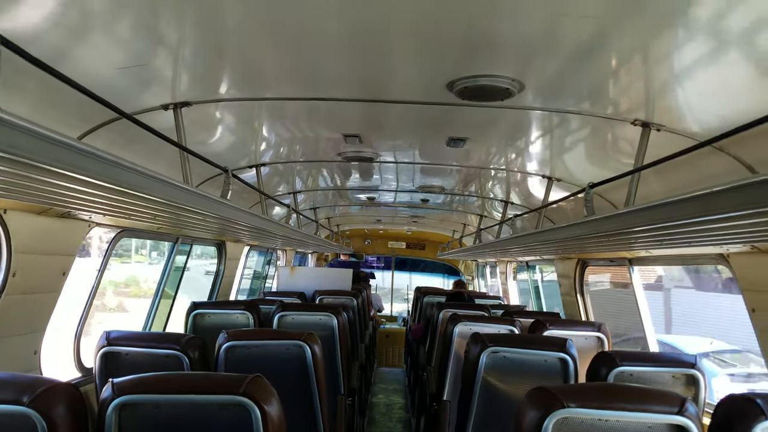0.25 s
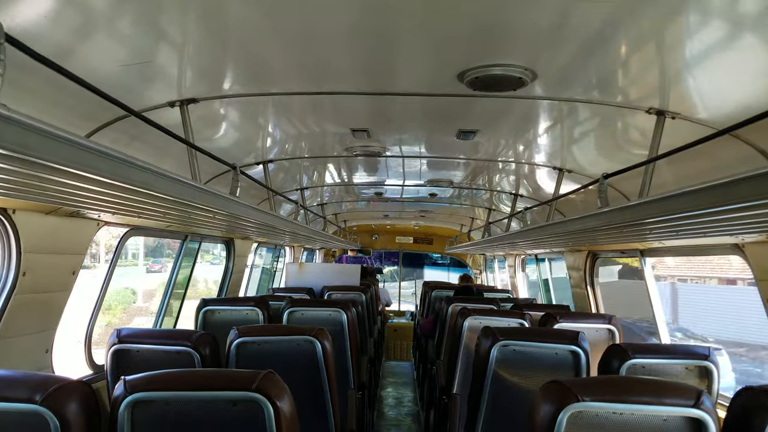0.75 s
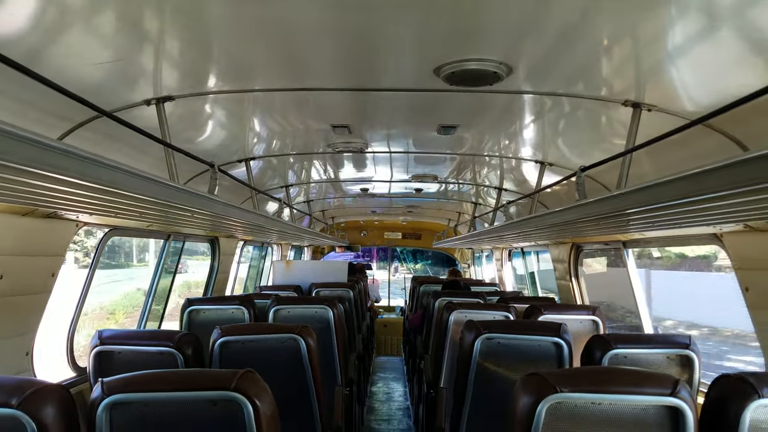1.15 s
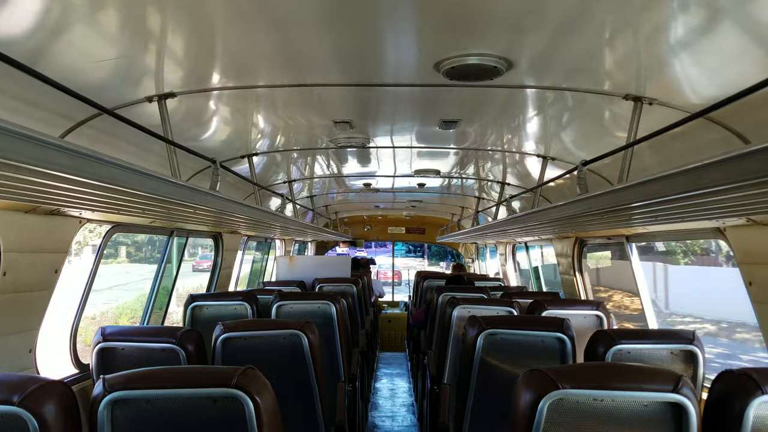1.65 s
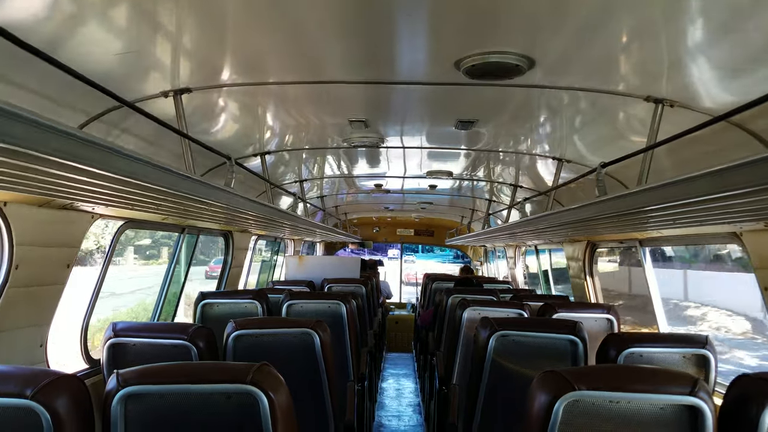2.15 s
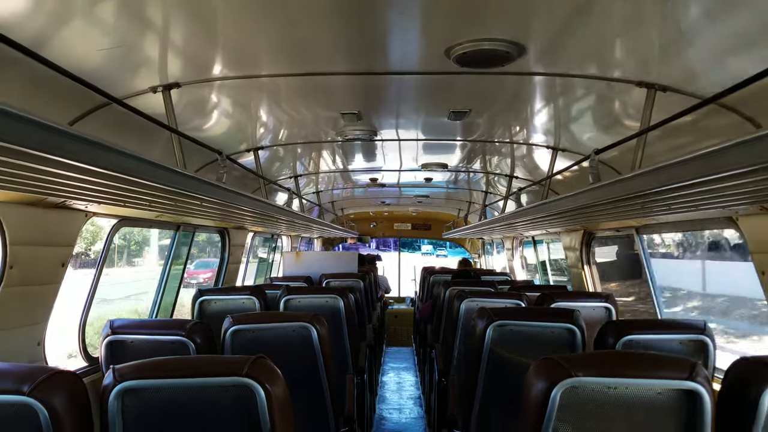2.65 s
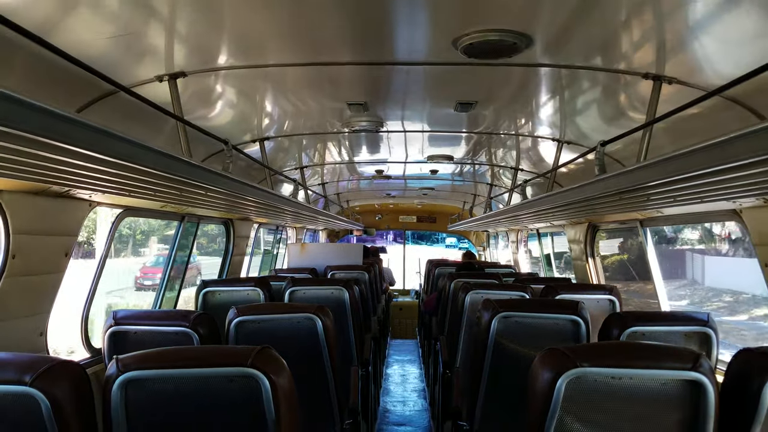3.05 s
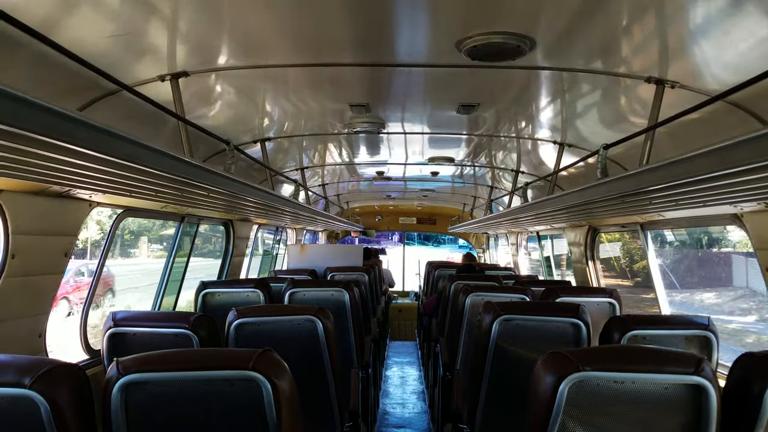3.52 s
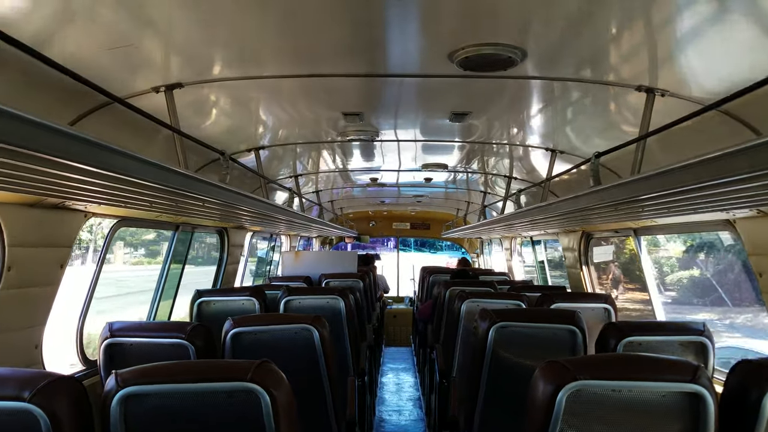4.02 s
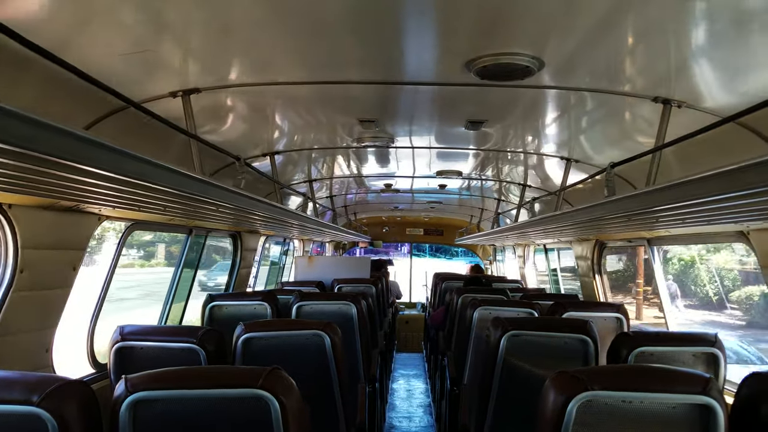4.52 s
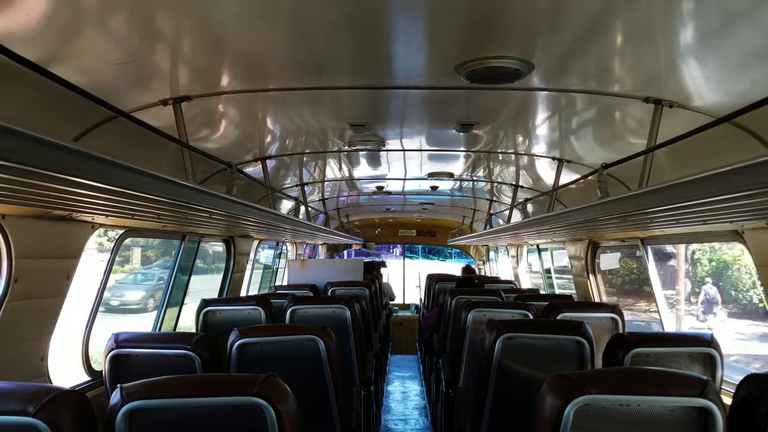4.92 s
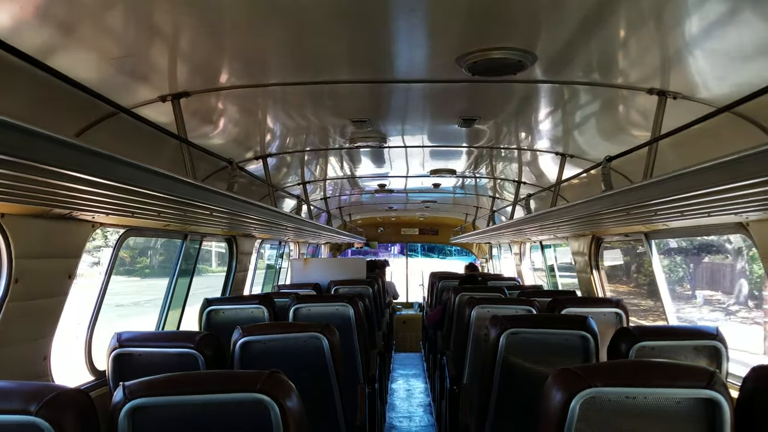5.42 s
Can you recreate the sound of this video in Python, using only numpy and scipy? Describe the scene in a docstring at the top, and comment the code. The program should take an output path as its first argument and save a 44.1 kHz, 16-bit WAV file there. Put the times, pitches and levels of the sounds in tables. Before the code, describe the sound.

A diesel engine drones deeply inside an old bus, rising in pitch then easing off, over road rumble and faint rattles.

```python
"""Old coach, from inside

It gathers speed along a street, then eases off. A six-cylinder two-stroke diesel and the faster drive
shaft drone together, their orders swelling as they cross cabin resonances. Around them: faint gear
whine, a singing panel, road rumble, engine roar and clatter, small rattles of the fittings."""
import sys
import numpy as np
from scipy import signal
from scipy.fft import rfft, irfft, next_fast_len
from scipy.io import wavfile
from scipy.ndimage import uniform_filter1d, minimum_filter1d

SR = 44100
rng = np.random.default_rng(int(sys.argv[2]) if len(sys.argv) > 2 else 0)


def unload_wav(signal):
    """Save mono or channel-first audio to the path in sys.argv[1] as 16-bit WAV at rate SR, clipped to [-1, 1]."""
    wavfile.write(
        sys.argv[1],
        SR,
        np.round(np.clip(np.atleast_2d(signal).T, -1, 1) * 32767).astype(np.int16),
    )


N = 250047
TIME = np.arange(N) / SR

# crank speed: t/s, f/Hz
CRANK_HZ = [(0, 20.1), (.74, 23.1), (1, 24), (1.97, 28), (2.71, 30.78), (3.45, 33.48), (4.19, 35.98),
            (4.62, 36.55), (5.2, 35.8), (5.42, 35), (5.67, 33.5)]
# strong orders, ahead of their path: multiple of own speed, level under load/dB, change off throttle/dB
CRANK_ORDERS = [(1, -20, 6.5), (3, -23.5, 4), (4, -22, 5), (5, -20, -0.5), (6, -14, -13)]
SHAFT_ORDERS = [(1, -18, 0.5), (2, -14, 1.5), (3, -14.5, 0), (4, -14, -1)]
# paths into the cabin, the shaft's through the floor: f/Hz, gain/dB
ENGINE_PATH_DB = [(22, -10.5), (36, -6.5), (62, -12), (86, 3.5), (98, -2.5), (126, -8), (150, 2), (162, 0),
                  (173, -10.5), (183, -1.5), (200, 1.5), (215, -1)]
SHAFT_PATH_DB = [(28, -22), (39, -5), (44, -5.5), (49, 3), (58, -17.5), (95, -13.5), (105, -3.5), (124, -1),
                 (132, 2.5), (138, 0), (145, -11), (160, -14.5), (205, -10.5)]
# weak tones: multiple of crank speed
WEAK_MULTIPLES = (1.235, 1.835, 2, 3.373, 3.635, 4.42, 5.248, 7.075, 8, 8.523, 9, 9.213, 9.777, 10, 10.885,
                  11.32, 12, 13, 14, 15.643, 15.8, 17, 21.1)
# same tones, ahead of the air modes: level/dB
WEAK_LEVELS_DB = [-36, -32.5, -26.5, -31, -28.5, -33.5, -32.5, -28, -35.5, -34, -29.5, -36, -37, -42.5, -33,
                  -41, -41, -41.5, -41, -45.5, -47, -42, -39]
# cabin air modes: f/Hz, gain/dB
AIR_MODES_DB = [(36, -8), (55, 0), (150, 0), (178, -4), (212, 6), (232, -3), (268, 4), (290, 1), (325, -4),
                (350, -1), (372, 4), (410, -2), (450, -6), (520, -4), (570, -2), (630, -5)]
# envelopes: t/s, relative level/dB
PANEL_ENVELOPE = [(0, -18.5), (.4, -29.5), (1, -31.5), (1.75, -26), (2.05, -30), (2.25, -25.5),
                  (2.7, -29.5), (3.5, -34), (3.7, -27.5), (4.6, -26.5), (4.95, -26), (5.2, -24),
                  (5.45, -35), (5.67, -28)]
ROAD_ENVELOPE = [(0, -15), (.4, -22), (.7, -16), (1.1, -21), (2.6, -19.5), (2.95, -19.5), (3.8, -25),
                 (4.1, -14), (4.6, -15), (5.3, -21.5), (5.67, -19)]
JINGLE_ENVELOPE = [(0.0, -55.5), (0.63, -52.5), (0.76, -55), (2.12, -55), (2.46, -53), (3.5, -53),
                   (3.58, -52.5), (4.55, -53), (5.67, -56)]
# noise spectra: f/Hz, relative level/dB
ROAD_SPECTRUM = [(12, -13), (20, 1.5), (35, -9.5), (52, -4.5), (70, -2), (88, 1.5), (130, 9.5), (165, 3.5),
                 (215, 5.5), (270, -13), (340, -13.5)]
ROAR_SPECTRUM = [(220, -9.5), (280, -3.5), (330, 0.5), (400, -2.5), (460, -5), (520, -1), (630, -9),
                 (790, -8.5), (900, -11), (1100, -15), (1400, -27.5)]
CLATTER_SPECTRUM = [(800, -12), (1200, 0.5), (1500, -0.5), (1950, -0.5), (2300, -1), (2800, -4),
                    (3400, -8.5), (4200, -13), (5000, -17.5), (5750, -23), (6150, -31), (8000, -36.5),
                    (10000, -38)]
JINGLE_SPECTRUM = [(8000, -28), (10200, -20.5), (11000, -10), (12200, -2.5), (13500, -1.5), (15200, -6),
                   (16000, 0.5)]
TICK_SPECTRUM = [(2500, -11.5), (5000, 6), (6800, -12.5), (8500, -22), (10500, -14.5), (12500, -1),
                 (15000, 1.5), (16000, -3)]
# coachwork resonances: f/Hz, width/Hz, gain/dB
COACHWORK_MODES = [(294, 37, 2), (394, 12, 7), (524, 22, -1), (662, 51, 3.5), (754, 8.3, 4.5)]
# ticks: t/s, level/dB, decay/s
FITTING_TICKS = [(.749, -47.5, 0.0079), (.791, -47, .01), (1.63, -52.5, 0.0086), (3.446, -54, 0.014),
                 (3.691, -45, 0.014), (4.055, -45, 0.017), (4.078, -39, 0.0084), (4.429, -47, 0.012),
                 (5.04, -57, .01), (5.185, -50, .014), (5.308, -54, 0.016)]
# squeaks: t/s, f/Hz, level/dB, half length/s, relative pitch scatter
FITTING_SQUEAKS = [(4.09, 15000, -48, .014, .002), (4.243, 15150, -42, .012, .002),
                   (4.21, 5450, -49, .025, .02), (4.29, 5600, -49, .03, .02)]
# stereo width: f/Hz, side minus mid/dB
WIDTH_DB = [(30, -26), (50, -16), (75, -14), (200, -18.5), (380, -9.5), (700, -6.5), (1200, 3.5),
            (2400, 0.5), (4400, 0.5), (8000, -0.5), (15000, 0.5)]
# noise balance: f/Hz, left minus right/dB
BALANCE_DB = [(60, 0.5), (500, 1), (1700, 0.5), (2800, 5), (4200, -1), (5200, -8), (6400, -7), (9800, 2.5),
              (15000, 6)]


def from_db(db):
    """Decibels to gain."""
    return 10 ** (np.asarray(db) / 20)


def unit_rms(x):
    """Scale to unit power."""
    return x / np.sqrt(np.mean(x ** 2) + 1e-20)


def in_time(table):
    """Table value at every sample."""
    return np.interp(TIME, *np.transpose(table))


def at_hz(table, hz):
    """Table value on a log-frequency axis."""
    table_hz, value = np.transpose(table)
    return np.interp(np.log(hz), np.log(table_hz), value)


def drift(rate_hz):
    """Low-passed random wander, unit RMS."""
    hop, settle = 40, 2000
    pole = np.exp(-2 * np.pi * rate_hz * hop / SR)
    white = rng.standard_normal(N // hop + settle + 2)
    slow = signal.lfilter([1], [1, -2 * pole, pole * pole], white)[settle:]
    return np.interp(np.arange(N) / hop, np.arange(len(slow)), unit_rms(slow))


def swell(at_s, half_length_s):
    """Flat-topped bump, 0 to 1 and back."""
    return np.exp(-((TIME - at_s) / half_length_s) ** 4)


def off_throttle(at_s=3.87, ramp_s=.3):
    """0 under load, 1 once released."""
    return np.clip((TIME - at_s) / ramp_s, 0, 1)


def tone(turns, order, flutter):
    """One fluttering order, unit RMS; standing waves shift its phase between the sides."""
    wave = np.exp(2j * np.pi * (order * turns + rng.random()))
    mid = wave * (1 + flutter * (drift(6) + 1j * drift(6))) / np.sqrt(1 + 2 * flutter ** 2)
    mean_hz = order * turns[-1] / TIME[-1]
    side = -1j * mid * from_db(at_hz(WIDTH_DB, mean_hz)) * np.exp(1j * drift(.95))
    return np.sqrt(2) * np.array([(mid + side).real, (mid - side).real])


def cabin_noise(spectrum, modes=()):
    """Stereo noise, unit RMS in the mid: alike in the bass, diffuse above, rippled by close modes."""
    size = next_fast_len(N, True)
    hz = np.maximum(np.arange(size // 2 + 1) * SR / size, 1)
    mid, side = rfft(rng.standard_normal((2, size)))
    side *= from_db(at_hz(WIDTH_DB, hz))
    octaves_outside = np.abs(np.log2(hz / np.clip(hz, spectrum[0][0], spectrum[-1][0])))
    modes_db = sum(db / (1 + (2 * (hz - mode_hz) / width_hz) ** 2) for mode_hz, width_hz, db in modes)
    shape_db = at_hz(spectrum, hz) + modes_db - 30 * octaves_outside
    grid_hz = np.arange(0, SR / 2, 18)
    ripple = np.array([np.interp(hz, grid_hz, row) for row in rng.standard_normal((2, len(grid_hz)))])
    ripple_db = 2.2 * ripple * np.minimum(hz / 800, 1)
    sign = np.array([[1], [-1]])
    gain = from_db(shape_db + ripple_db + sign * at_hz(BALANCE_DB, hz) / 2)
    noise = irfft((mid + sign * side) * gain, size)[:, :N]
    return noise / np.std(noise.mean(axis=0))


def drone(turns, speed_hz, orders, path):
    """Orders of a turning part sweep through the booms and dead spots of its path."""
    total = 0
    for order, load_db, change_db in orders:
        level_db = load_db + change_db * off_throttle() + at_hz(path, order * speed_hz)
        total += from_db(level_db) * tone(turns, order, flutter=.1)
    return total


def weak_tones(turns, crank_hz, off_throttle_db=-.5):
    """Unsteady orders of engine, shaft and belt-driven parts cross the air modes."""
    total = 0
    for order, db in zip(WEAK_MULTIPLES, WEAK_LEVELS_DB):
        total += from_db(db + at_hz(AIR_MODES_DB, order * crank_hz)) * tone(turns, order, flutter=.3)
    return from_db(off_throttle_db * off_throttle()) * total


def gear_whine(turns, teeth=27, base_db=-49, overrun_db=11):
    """Gear mesh: faint under load, sings briefly on the overrun."""
    level_db = base_db + overrun_db * swell(at_s=4.96, half_length_s=.34)
    return from_db(level_db) * tone(turns, teeth, flutter=.15)


def panel(note_hz=566.4, wander_hz=3.5, sway_hz=23, trim_db=-4.5):
    """A body panel sings a wavering note that trembles as it sways."""
    cycles = np.cumsum(note_hz + wander_hz * (drift(2) + drift(25))) / SR
    sway_cycles = np.cumsum(sway_hz + 3 * drift(4)) / SR
    tremble = 1 + .5 * np.cos(2 * np.pi * sway_cycles)
    return from_db(in_time(PANEL_ENVELOPE) + trim_db) * tremble * tone(cycles, order=1, flutter=.3)


def road_rumble():
    """Rises and falls with the surface."""
    return from_db(in_time(ROAD_ENVELOPE)) * cabin_noise(ROAD_SPECTRUM)


def firing_throb(turns, depth, cylinders=6):
    """One puff per cylinder per turn, unequal in strength."""
    strength = 1 + .3 * rng.standard_normal(cylinders)
    firings = cylinders * turns
    puffs = strength[firings.astype(int) % cylinders] * np.sin(np.pi * firings) ** 2
    return unit_rms(1 + depth * puffs)


def engine_roar(turns, speed_octaves, cruise_db=-25.5, db_per_octave=2):
    """Throbbing noise through the coachwork; grows with speed, swells once on the way up."""
    level_db = cruise_db + db_per_octave * speed_octaves + 1.5 * swell(at_s=2.3, half_length_s=.42)
    return from_db(level_db) * cabin_noise(ROAR_SPECTRUM, COACHWORK_MODES) * firing_throb(turns, .36)


def engine_clatter(turns, speed_octaves, cruise_db=-36.5, db_per_octave=3.5):
    """Bright noise pulsed by the firings; grows with speed."""
    level_db = cruise_db + db_per_octave * speed_octaves + .75 * drift(2.8)
    return from_db(level_db) * cabin_noise(CLATTER_SPECTRUM) * firing_throb(turns, .25)


def jingle(trim_db=2):
    """Fine, flickering treble of the fittings."""
    return from_db(in_time(JINGLE_ENVELOPE) + trim_db + .9 * drift(35)) * cabin_noise(JINGLE_SPECTRUM)


def ticks():
    """Loose fittings tick as the body flexes: decaying noise bursts."""
    envelope = sum(from_db(db) * (TIME >= at_s) * np.exp(-np.abs(TIME - at_s) / decay_s)
                   for at_s, db, decay_s in FITTING_TICKS)
    return envelope * cabin_noise(TICK_SPECTRUM)


def squeaks():
    """Fittings slip: short, thin tones of unsteady pitch."""
    total = 0
    for at_s, hz, db, half_length_s, scatter in FITTING_SQUEAKS:
        cycles = np.cumsum(hz * (1 + scatter * drift(200))) / SR
        envelope = from_db(db) * np.exp(-((TIME - at_s) / half_length_s) ** 2)
        total += envelope * np.sqrt(2) * np.sin(2 * np.pi * (cycles + rng.random((2, 1))))
    return total


def scene(shaft_ratio=1.415, cruise_hz=30):
    """All turning parts follow the crank; body jolts shake roar, clatter and jingle together."""
    crank_hz = in_time(CRANK_HZ)
    turns = np.cumsum(crank_hz) / SR
    speed_octaves = np.log2(crank_hz / cruise_hz)
    engine = drone(turns, crank_hz, CRANK_ORDERS, ENGINE_PATH_DB)
    shaft = drone(shaft_ratio * turns, shaft_ratio * crank_hz, SHAFT_ORDERS, SHAFT_PATH_DB)
    tones = engine + shaft + weak_tones(turns, crank_hz) + gear_whine(turns) + panel()
    road = road_rumble()
    shaken = engine_roar(turns, speed_octaves) + engine_clatter(turns, speed_octaves) + jingle()
    jolts = from_db(.84 * drift(28))
    return tones + road + jolts * shaken + ticks() + squeaks()


def record(dry, ceiling=.97, window_samples=300, fade_s=.003, cutoff_hz=15750):
    """Peak limiter, end fades, steep low-pass."""
    safe_gain = np.minimum(1, ceiling / (np.abs(dry).max(axis=0) + 1e-9))
    gain = uniform_filter1d(minimum_filter1d(safe_gain, window_samples), window_samples)
    from_edge_s = np.minimum(TIME, TIME[-1] - TIME)
    fade = np.sin(np.pi / 2 * np.minimum(from_edge_s / fade_s, 1)) ** 2
    lowpass = signal.ellip(12, .05, 80, cutoff_hz, fs=SR, output="sos")
    return signal.sosfilt(lowpass, dry * gain * fade)


dry = scene()
out = record(dry)
unload_wav(out)
```